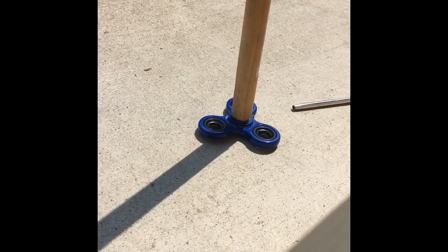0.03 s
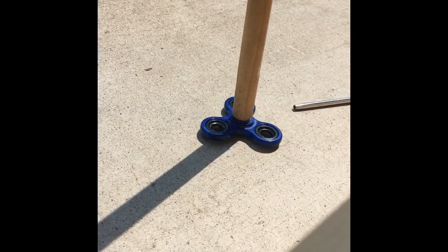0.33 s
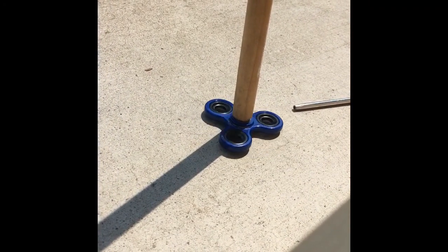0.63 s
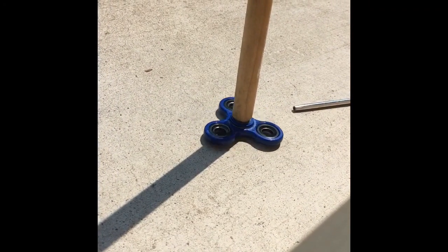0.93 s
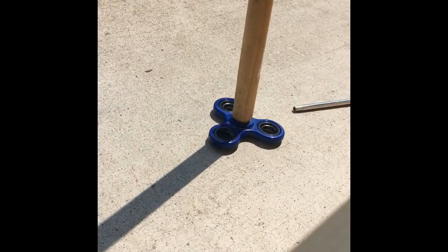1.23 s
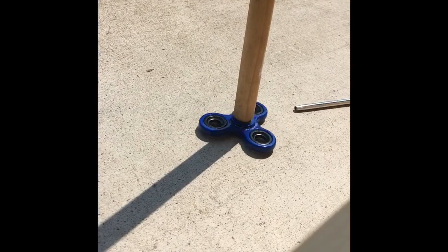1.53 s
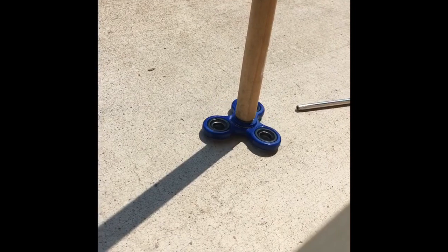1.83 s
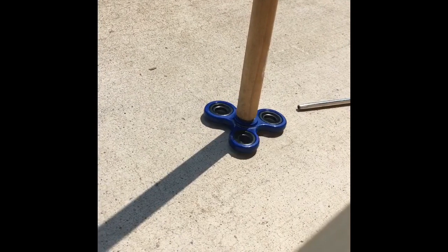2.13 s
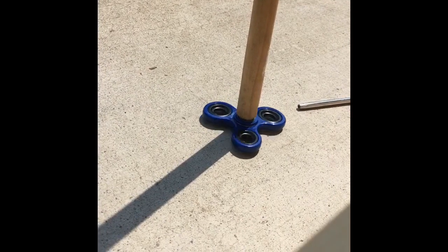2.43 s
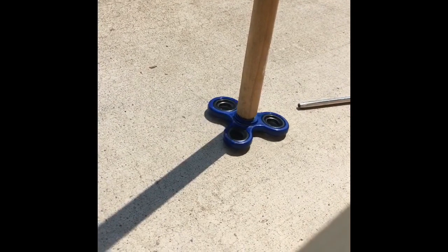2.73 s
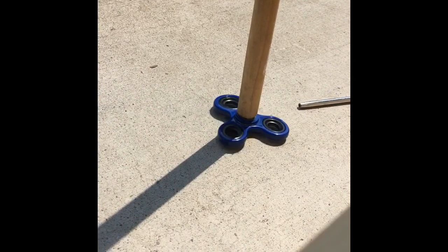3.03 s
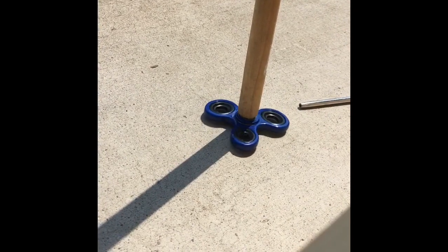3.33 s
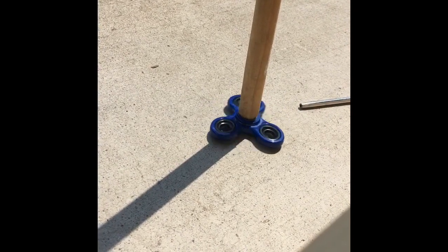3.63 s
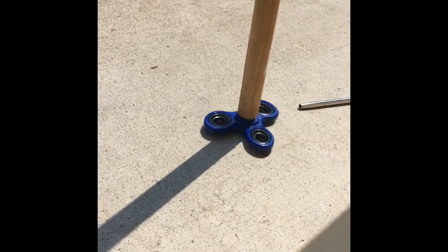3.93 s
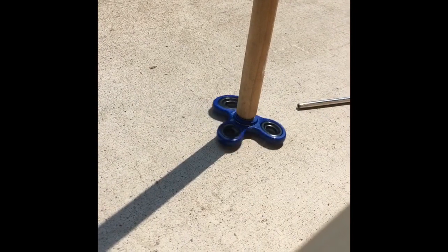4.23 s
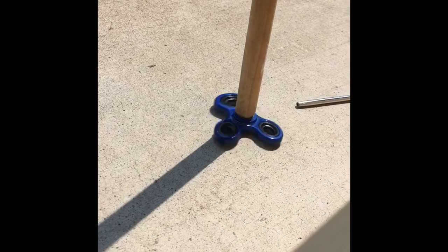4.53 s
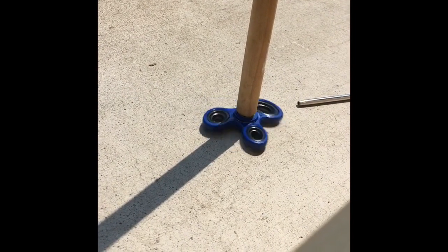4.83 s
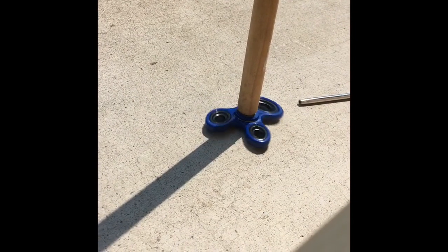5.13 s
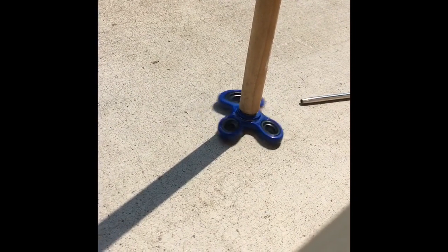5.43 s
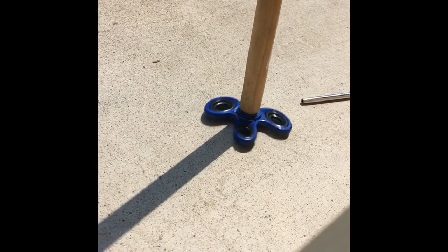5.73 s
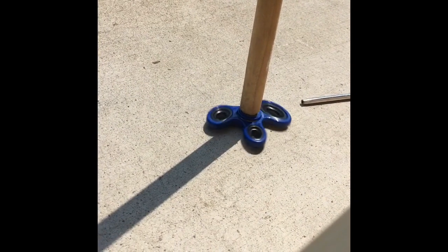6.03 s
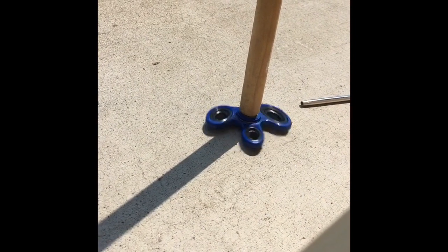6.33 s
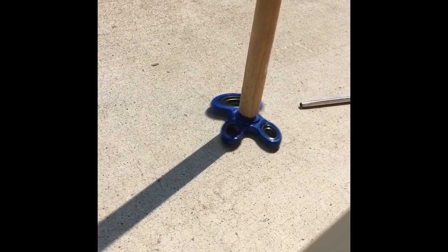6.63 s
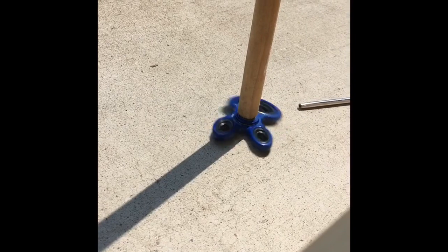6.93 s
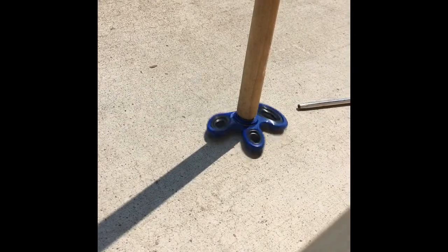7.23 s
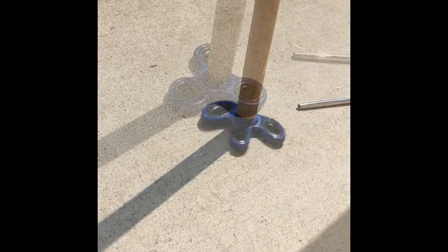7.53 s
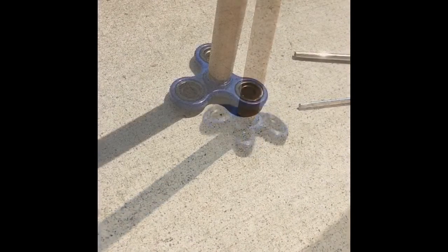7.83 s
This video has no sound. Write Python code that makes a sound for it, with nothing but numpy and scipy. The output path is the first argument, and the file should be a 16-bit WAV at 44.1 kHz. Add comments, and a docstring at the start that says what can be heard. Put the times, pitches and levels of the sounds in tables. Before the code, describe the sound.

A loud, bright hiss of compressed air is present from the start, close and dry in the open air, blowing on a small three-armed spinner. Each passing arm chops the jet into a short rising swish, about three per second at first. The swishes accelerate quickly, becoming a fast flutter by about 1.5 seconds. From around 2 seconds a faint, low, buzzy hum emerges beneath the hiss and climbs steadily in pitch, growing somewhat stronger. By 4 to 5 seconds the flutter has blurred into a smoother, slightly thinner whirring rush, with the hiss still dominant. The hum keeps rising, more slowly towards 7 seconds. From about 7.2 seconds the jet and hum fade together, almost gone just after 8 seconds. A distant motor drones very faintly at the start, sinks away, and returns softly during the fade.

```python
"""Outdoors on concrete: a compressed-air nozzle blows on a three-armed spinner pinned under a wooden stick.
Each arm crossing the hissing jet makes a rising swish and a pressure push. As the spinner speeds up,
the swishes blur into flutter and the pushes join into a climbing hum.
A motor drones far off; the jet fades out at the end."""
import sys
import numpy as np
from scipy import signal
from scipy.fft import rfft, irfft
from scipy.io import wavfile

SR = 44100
rng = np.random.default_rng(int(sys.argv[2]) if len(sys.argv) > 2 else 0)


def to_wav(s):
    """Save 16-bit WAV."""
    ch = np.atleast_2d(s).T  # columns
    pcm = np.round(np.clip(ch, -1, 1) * 32767)  # PCM
    wavfile.write(sys.argv[1], SR, pcm.astype(np.int16))


N = 356328
TIME_S = np.arange(N) / SR
BIN_HZ = np.fft.rfftfreq(N, 1 / SR)


def undb(db):
    """Decibels to gain."""
    return 10 ** (np.asarray(db) / 20)


def unit(x):
    """Scale to rms 1."""
    return x / np.sqrt(np.mean(x ** 2))


def over_bins(hz, values):
    """Interpolate onto the spectral bins, log-frequency axis."""
    return np.interp(np.log(np.maximum(BIN_HZ, 1)), np.log(hz), values)


def noise_spectrum(points):
    """Noise spectrum shaped by (frequency [Hz], density [dB]) points."""
    return rfft(rng.standard_normal(N)) * undb(over_bins(*np.transpose(points)))


def walk(rate_hz):
    """Smooth random drift, rms 1."""
    return unit(irfft(rfft(rng.standard_normal(N)) / (1 + (BIN_HZ / rate_hz) ** 2), N))


def fade(start_s=7.19, length_s=.96):
    """Closing gain of jet and spinner: 1, then linear towards 0."""
    return np.clip(1 - (TIME_S - start_s) / length_s, 0, 1)


def motor(wander_rad=.22, start_db=-43.3, sink_db_per_s=6, floor_db=-66, end_db=-41.5):
    """Distant motor: two unsteady tones in a rumble; sinks away, returns as the jet fades."""
    # (frequency [Hz], density [dB])
    rumble = [(20, -38), (30, -24), (40, -17), (53, 6), (72, -7), (100, 2), (135, -10.5), (200, -11.5),
              (400, -31), (1000, -25), (4000, -70)]
    # (frequency [Hz], relative level [dB])
    tones = [(102.6, -5), (119.3, -6.5)]
    drone = undb(-1.2) * unit(irfft(noise_spectrum(rumble), N))
    for hz, db in tones:
        phase = 2 * np.pi * hz * TIME_S + wander_rad * walk(1.5)
        drone += np.sqrt(2) * undb(db) * np.sin(phase)
    sinking = undb(start_db - sink_db_per_s * TIME_S) + undb(floor_db)
    return drone * (sinking * fade() + undb(end_db) * (1 - fade()))


def crossing_rate_hz():
    """Spin-up: arms crossing the jet per second."""
    # (time [s], crossing rate [Hz])
    spin_up = [(0.0, 3.18), (0.25, 4.59), (1.2, 18.34), (1.42, 26.19), (1.65, 26.34), (2.4, 39.36),
               (3.0, 52.6), (3.6, 68.5), (4.0, 78.6), (4.8, 110.6), (5.4, 133.0), (6.0, 152.0),
               (6.55, 167.5), (7.05, 179.4), (7.55, 188.7), (8.08, 195.4)]
    return np.interp(TIME_S, *np.transpose(spin_up))


def arm_hum(crossings, rate_hz, base_db=-45.9, db_per_octave=4.8, onset_hz=28, waver_db=1.0):
    """Each arm deflects the jet once; the pushes fuse into a hum that wavers with the turbulence."""
    # harmonics of one push: (order [x crossing rate], level [dB])
    harmonics = [(1, 3), (2, -7.5), (3, -13), (4, -15), (5, -15), (6, -12), (7, -11), (8, -23), (9, -19),
                 (10, -17)]
    # radiation efficiency: (frequency [Hz], gain [dB])
    radiation = [(20, -10), (40, -1), (110, -1.5), (210, 0), (400, -2), (530, 5), (615, 0), (700, 6.5),
                 (800, 1.5), (1100, 4.5), (1600, 4)]
    phase = 2 * np.pi * (crossings - .11)  # push peaks .11 into each crossing
    pushes = 0
    for order, db in harmonics:
        radiated_db = np.interp(order * rate_hz, *np.transpose(radiation))
        drift_db = waver_db * np.log(1 + order) * walk(12)
        pushes += undb(db + radiated_db + drift_db) * np.cos(order * phase)
    growth_db = db_per_octave * np.log2(rate_hz / rate_hz.max())
    onset = 1 / (1 + (onset_hz / rate_hz) ** 5)
    return np.sqrt(2) * pushes * undb(base_db + growth_db) * onset


def hollow_colour():
    """Gain per bin: peaks and notches from nearby surfaces and the microphone port."""
    # (centre [Hz], width [Hz], gain [dB])
    peaks = [(2480, 130, 1.7), (3830, 185, 3.5), (4480, 190, 1.9), (4940, 280, -4), (5630, 190, -2.5),
             (6120, 530, 2.5), (7050, 720, 4), (7720, 660, -2.5), (8160, 380, -2), (9610, 680, 2.5),
             (10450, 400, -4.5), (10950, 700, 2), (12130, 560, 2.5), (13200, 640, 2.5), (14500, 680, 4)]
    return undb(sum(db / (1 + (2 * (BIN_HZ - hz) / width_hz) ** 2) for hz, width_hz, db in peaks))


def nozzle_aim_db():
    """Wandering aim: brief swells and dips. Rows: whole hiss, extra for the midrange."""
    # Gaussian humps: (time [s], half-width [s], hiss [dB], midrange [dB])
    swells = [(.01, 0.048, 2, -2), (.27, .05, 1, -.3), (1.05, 0.11, 0.6, 0.1), (1.48, 0.079, -0.7, -0.5),
              (2.15, 0.21, 0.3, 0.9), (2.52, 0.074, 1.5, -0.2), (2.98, 0.049, 1, -0.1),
              (4.03, .09, 1.7, -0.2), (4.45, 0.068, 1, 0)]
    return sum(np.outer(heights_db, np.exp(-.5 * ((TIME_S - at_s) / width_s) ** 2))
               for at_s, width_s, *heights_db in swells)


def arm_impact_db(rate_hz, slow_db=3.5, fast_db=-3, midpoint_hz=29):
    """Midrange lift: the jet hits slow arms hard; fast ones run with it and are hit softly."""
    slowness = 1 / (1 + (rate_hz / midpoint_hz) ** 2.1)
    return fast_db + (slow_db - fast_db) * slowness


def jet(crossings, rate_hz, base_db=-14, sag_db_per_s=.1458, gust_db=.2, eddy_db=.28, flicker_db=.51):
    """Turbulent hiss; an arm entering the jet lifts the low bands first, the treble last."""
    # (frequency [Hz], density [dB])
    hiss = [(150, -28), (300, -30), (410, -28.5), (530, -24.5), (800, -22), (1050, -15), (1700, -14.5),
            (3200, -11.5), (5500, -12), (8500, -5.5), (12000, -3), (15600, -5)]
    # swish of one arm:
    # (band [Hz], crest [crossings], height [dB], width [crossings], lift [dB per dB of impact])
    swish_bands = [(300, -.15, 3, .2, .8), (650, -.17, 5.5, .2, 1.1), (1220, -.27, 8, .18, 1.4),
                   (1750, -.16, 5, .2, .9), (2500, -.1, 4.9, .18, .8), (3900, -.01, 5.4, .13, .6),
                   (6600, .02, 5.6, .14, .3), (9400, .07, 3.5, .16, .15), (13000, .08, 1.6, .2, 0)]
    spectrum = noise_spectrum(hiss) * hollow_colour()
    spectrum /= np.std(irfft(spectrum, N))
    swell_db, midrange_db = nozzle_aim_db()
    impact_db = arm_impact_db(rate_hz) + midrange_db
    depth = 1 + .05 * impact_db  # a squarer hit chops deeper
    turbulence_db = gust_db * walk(16) + eddy_db * walk(170)
    band_hz = np.transpose(swish_bands)[0]
    chopped = 0
    for (_, crest, height_db, width, lift), selector in zip(swish_bands, np.eye(len(swish_bands))):
        band = irfft(spectrum * over_bins(band_hz, selector), N)
        # nearest arm's distance from this band's crest
        offset = np.sin(np.pi * (crossings - crest)) / np.pi
        nearness = np.exp(-.5 * (offset / width) ** 2)
        swish = unit(undb(height_db * depth * (nearness - nearness.mean())))
        chopped += band * swish * undb(lift * impact_db + flicker_db * walk(37))
    return chopped * undb(base_db - sag_db_per_s * TIME_S + swell_db + turbulence_db)


def scene():
    """Jet and spinner over the motor; open air, both channels alike."""
    rate_hz = crossing_rate_hz()
    crossings = np.cumsum(rate_hz) / SR - .03
    spinner = jet(crossings, rate_hz) + arm_hum(crossings, rate_hz)
    mono = spinner * fade() + motor()
    return np.array([mono, mono])


def record(dry, low_cut_hz=44, top_hz=15750):
    """Band limits: deepest bass dropped, top cut steeply."""
    highpass = signal.butter(4, low_cut_hz, "highpass", fs=SR, output="sos")
    lowpass = signal.ellip(12, .1, 80, top_hz, fs=SR, output="sos")
    return signal.sosfilt(lowpass, signal.sosfilt(highpass, dry))


dry = scene()
out = record(dry)
to_wav(out)
```